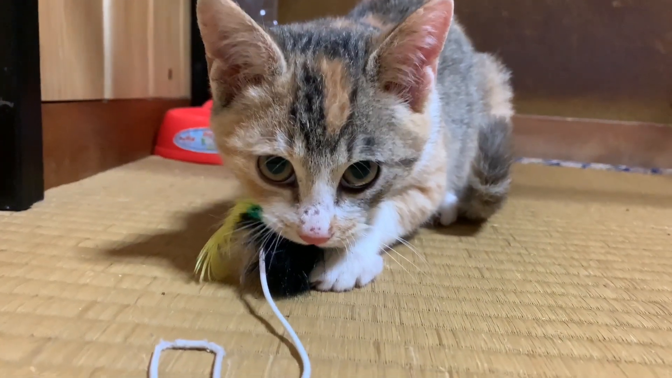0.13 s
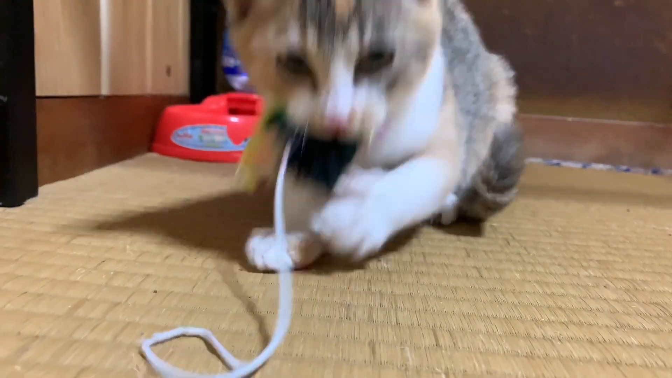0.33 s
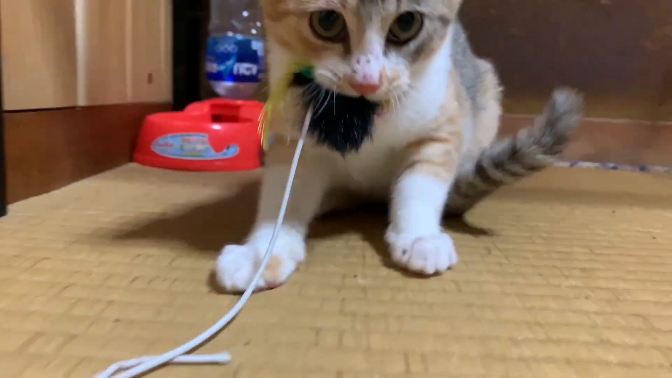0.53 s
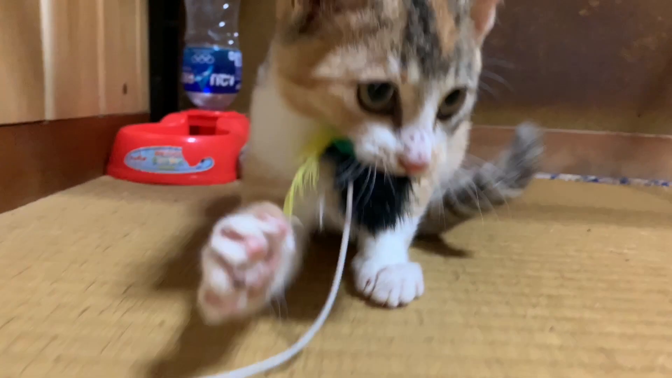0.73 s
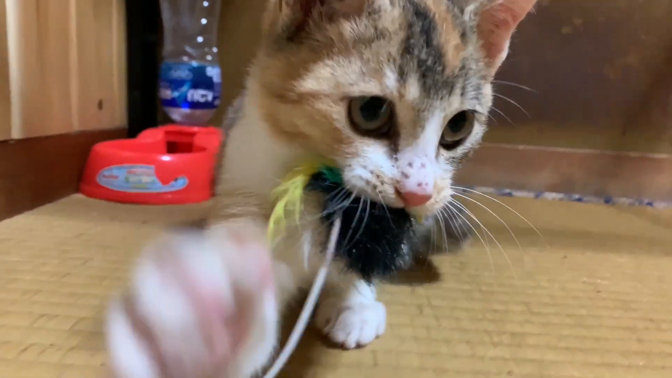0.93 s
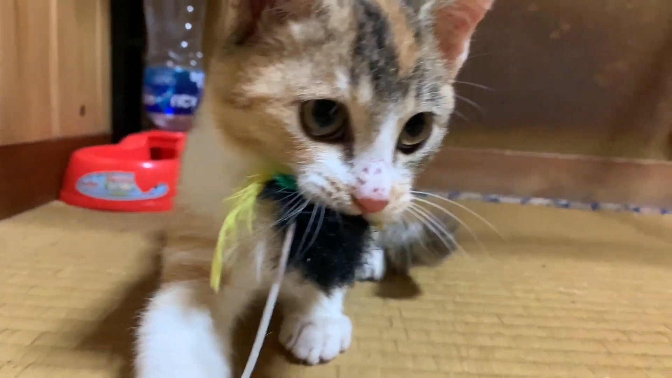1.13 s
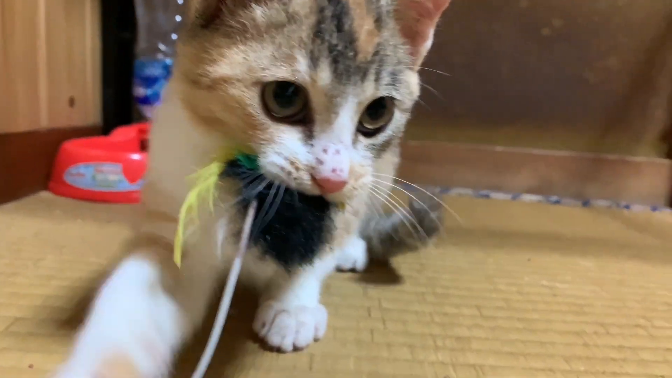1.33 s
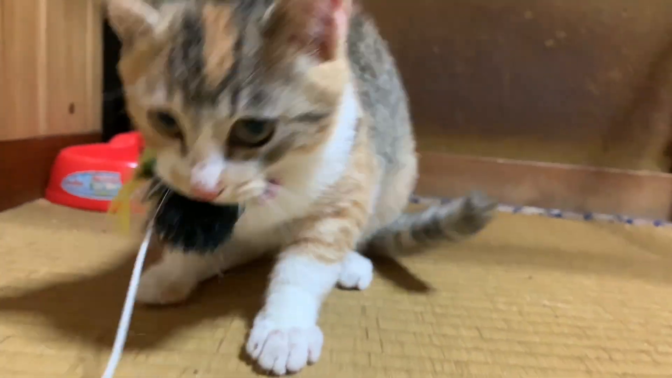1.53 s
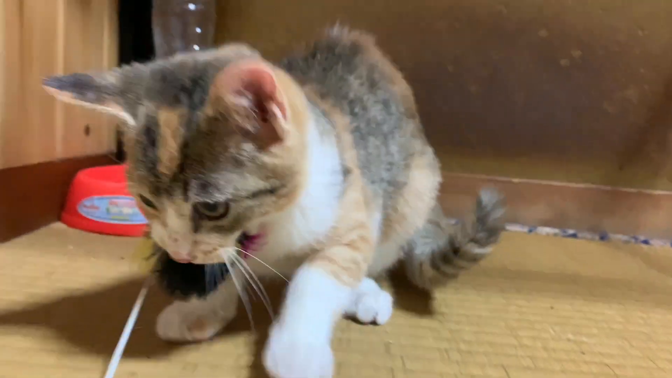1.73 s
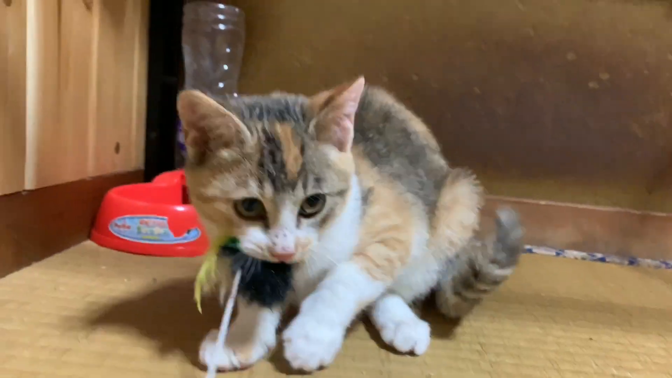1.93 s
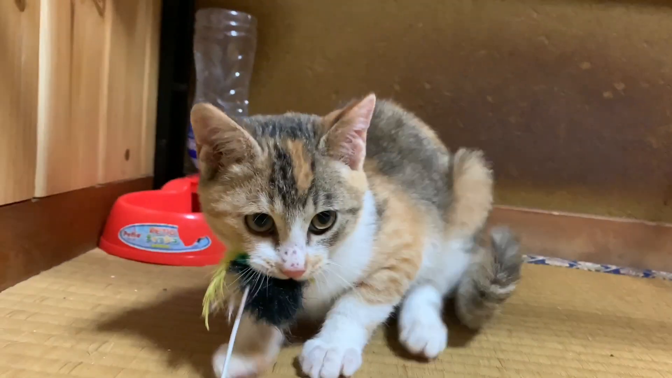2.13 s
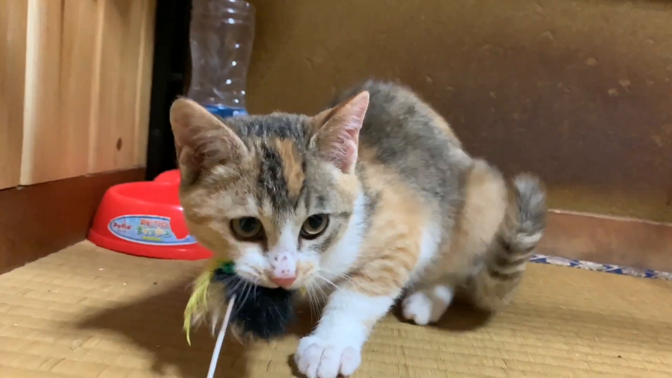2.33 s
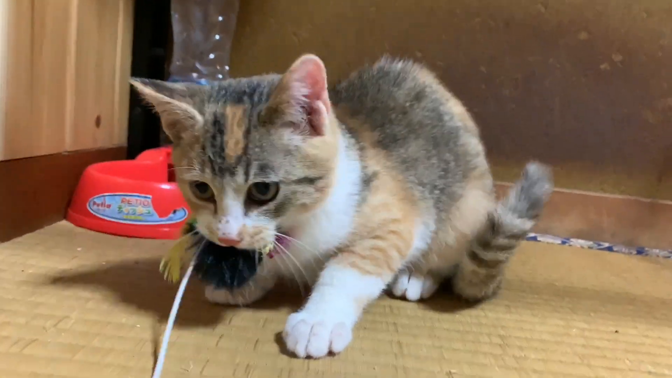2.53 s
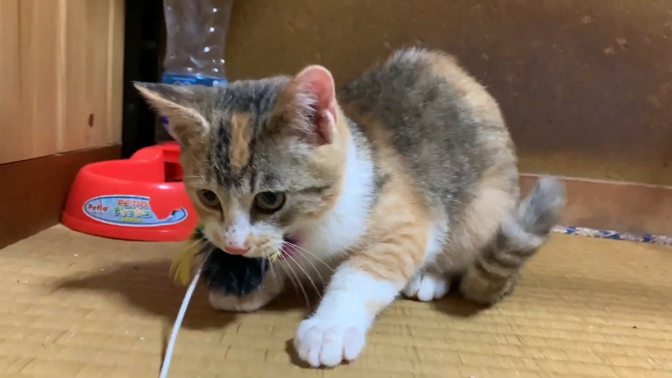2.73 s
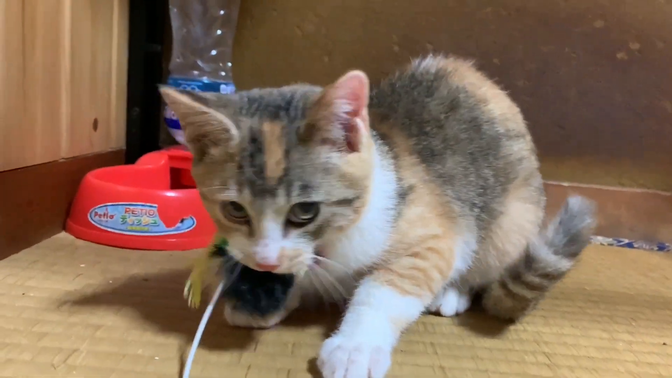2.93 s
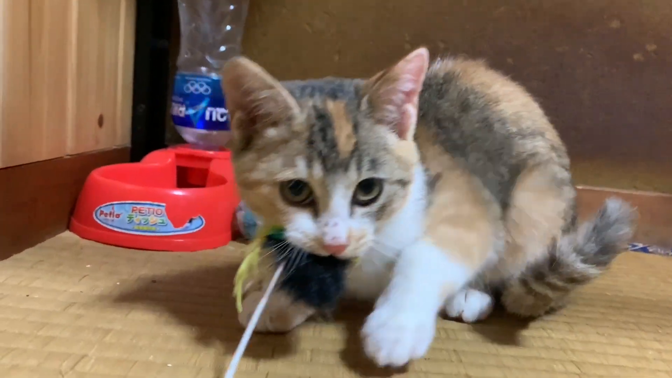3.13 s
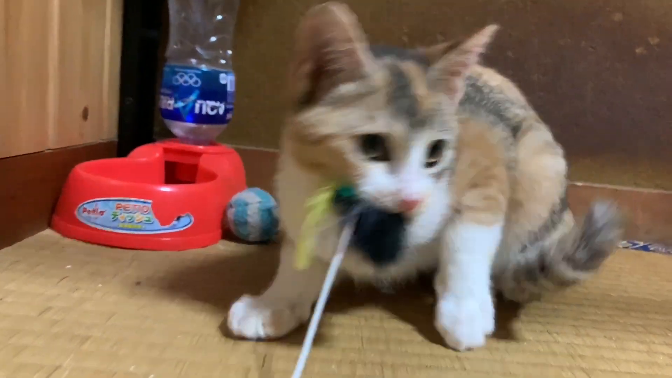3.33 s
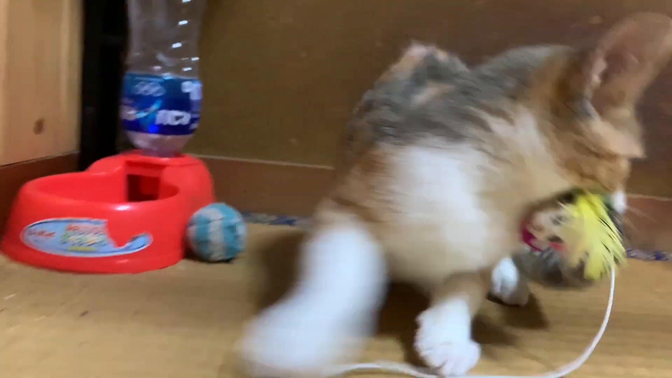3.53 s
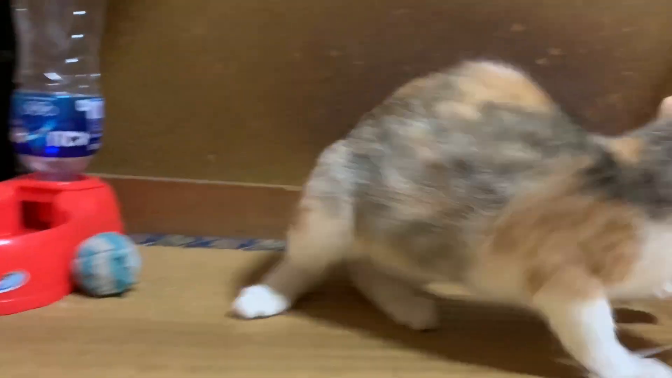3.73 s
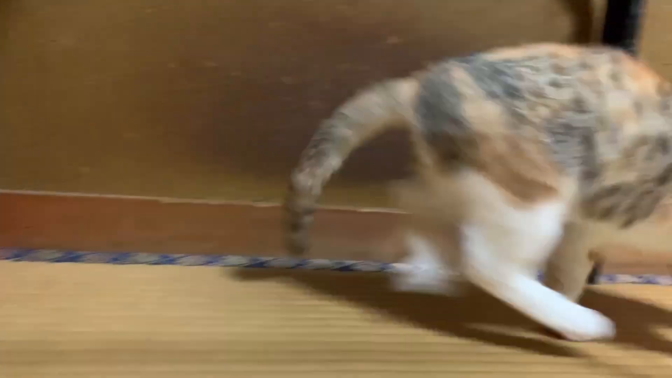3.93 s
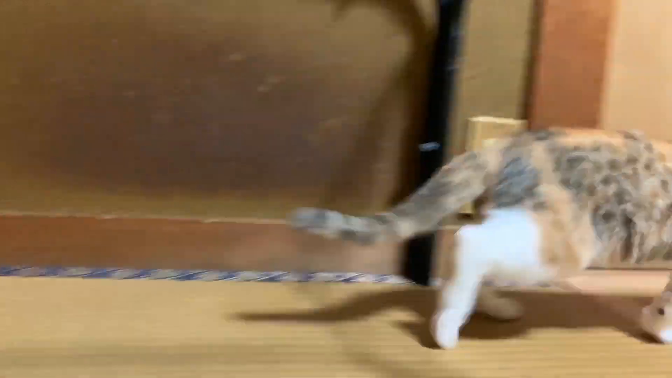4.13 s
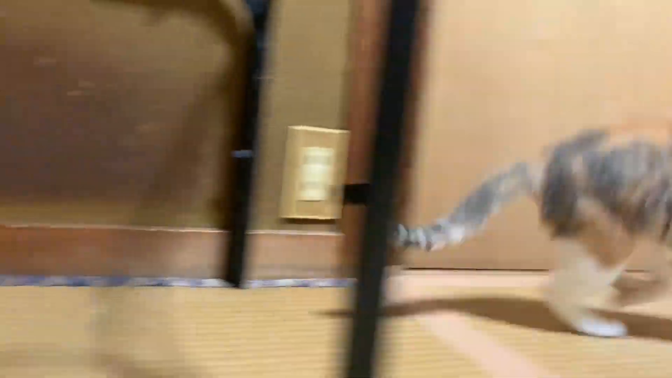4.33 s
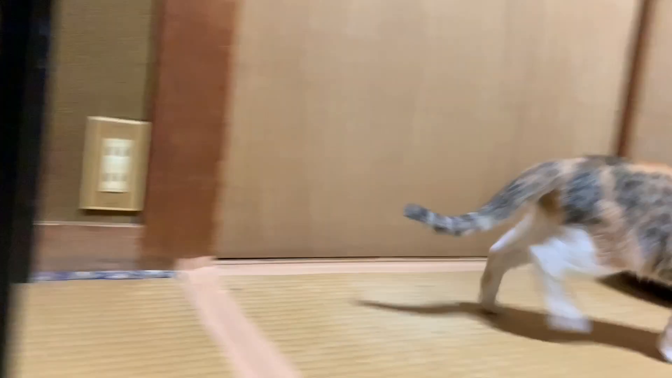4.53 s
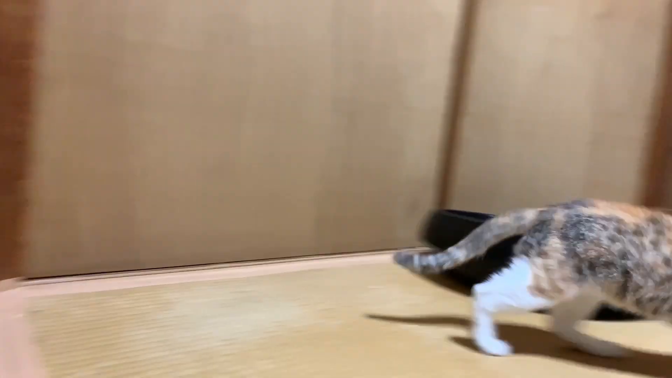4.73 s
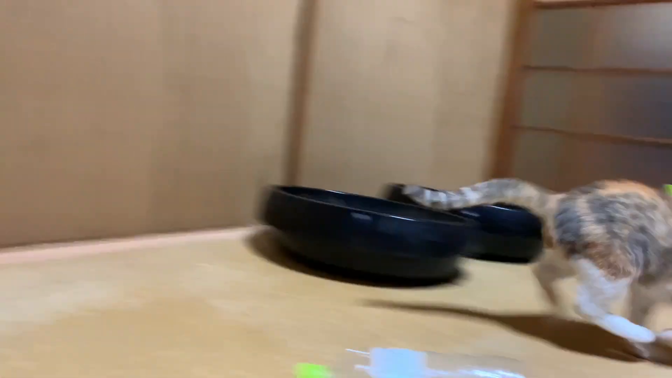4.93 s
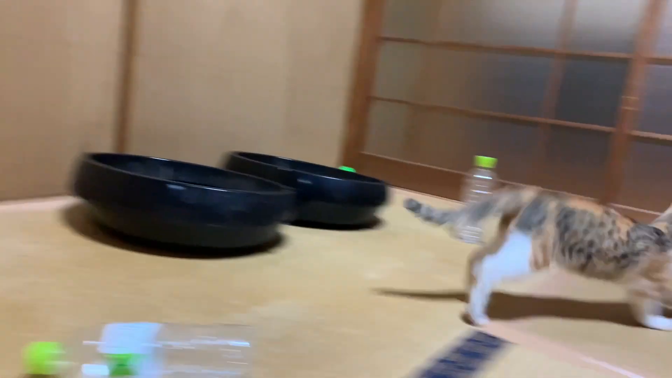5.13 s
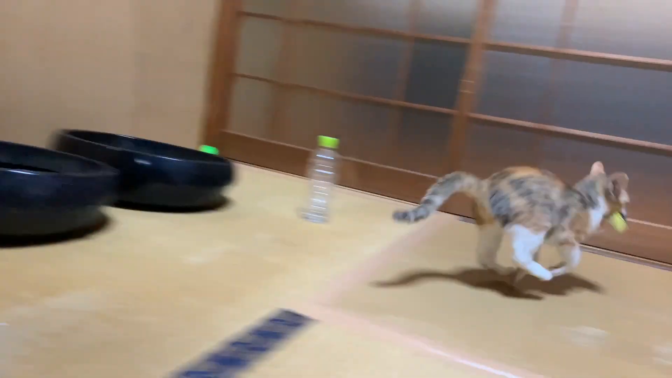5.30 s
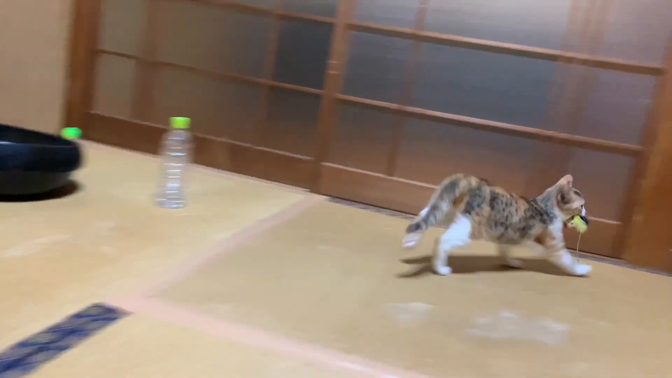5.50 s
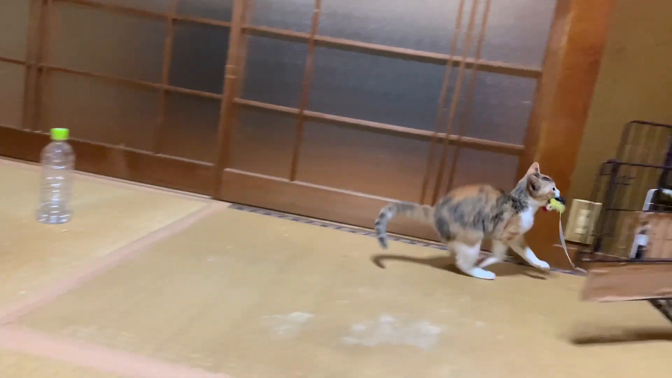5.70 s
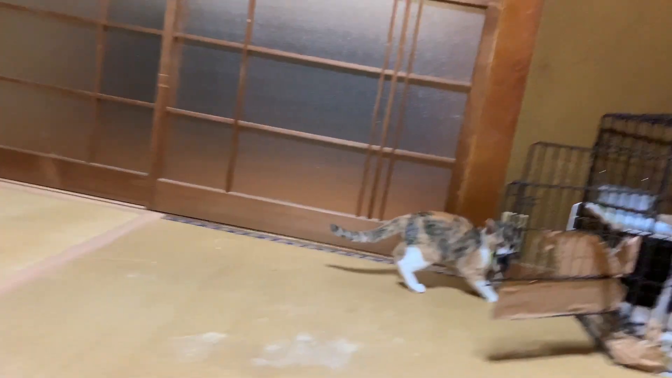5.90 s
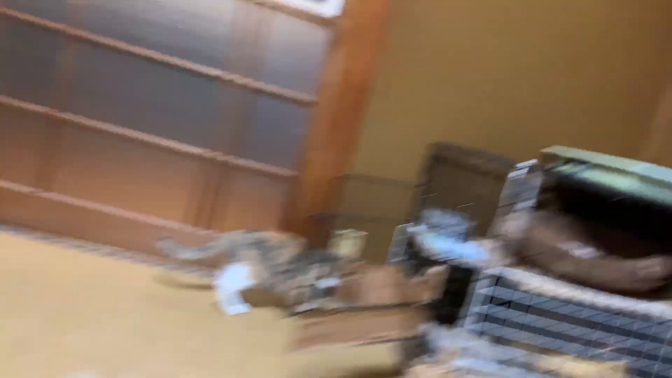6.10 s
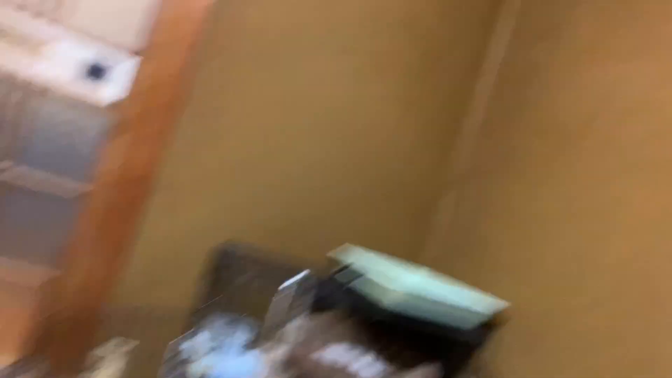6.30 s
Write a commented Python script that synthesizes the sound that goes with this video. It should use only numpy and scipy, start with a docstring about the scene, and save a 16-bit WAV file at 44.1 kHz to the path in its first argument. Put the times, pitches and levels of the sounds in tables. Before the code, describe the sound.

A kitten gives a short low rasping growl through a toy in its mouth, then bolts off, the toy's wand clattering and scraping over straw matting.

```python
"""A kitten growls over a feather toy in its mouth: pulsing folds, throat resonances and rasping air.
It shuffles on a straw mat (filtered noise), then runs off to the right with the toy. The toy's cord and
plastic wand drag and clatter behind: rubbing noise, cracks and ringing modes. Paws ring the boards,
low decaying swings thump through the floor, straw and throat tick. A small room, low rumble, faint hiss."""
import sys
import numpy as np
from scipy import signal
from scipy.fft import rfft, irfft
from scipy.io import wavfile
from scipy.ndimage import uniform_filter1d, map_coordinates

SR = 44100
rng = np.random.default_rng(int(sys.argv[2]) if len(sys.argv) > 2 else 0)


def unload_audio(sound):
    """Save the sound as a 16-bit wav file, at the path given as the first command line argument."""
    columns = np.transpose(np.atleast_2d(sound))
    # keep every value between -1 and 1, then stretch to whole-number steps
    steps = np.round(np.clip(columns, -1, 1) * 32767)
    wavfile.write(sys.argv[1], SR, steps.astype(np.int16))


N = 284797
TIME = np.arange(N) / SR

TURN_S, TURN_LENGTH_S = 0.277, 0.018  # the air turns from inward to outward
IN_HZ, OUT_HZ, SAG_HZ_PER_S = 146.6, 139.06, 17
OVERSHOOT_HZ, SETTLE_S, DROP_HZ_PER_DB = 33, 0.028, 1.4  # outward pitch starts high, drops as air is spent
TREMBLE_HZ, TREMBLE_DB = 13.3, 3.0  # inward stroke only
PUSH_S, PUSH_WIDTH_S = 0.314, 0.044
SPENT_S, RELEASE_DB_PER_S = 0.8, 135
# Growl layers. Each: inward level in dB, outward level in dB, lift in the push in dB, outward sag in dB per s.
CHEST, MOUTH, RASP = (-44.5, -37, 5, 12.5), (-57, -39.5, 4, 12), (-63, -58, -2, 7)


def effort(unsteady_db=1.2, wander=0.007):
    """Breath drive: share of air flowing out, fold pitch in Hz, and gains of chest, mouth and rasp."""
    outward = np.clip((TIME - TURN_S) / TURN_LENGTH_S + 0.5, 0, 1)
    since_s = np.maximum(TIME - TURN_S, 0)
    tremble_db = TREMBLE_DB * np.cos(2 * np.pi * TREMBLE_HZ * TIME)
    push = np.exp(-((TIME - PUSH_S) / PUSH_WIDTH_S) ** 2)
    spent_db = RELEASE_DB_PER_S * np.maximum(TIME - SPENT_S, 0)
    force_db = unsteady_db * waver(31) - spent_db
    out_hz = OUT_HZ + OVERSHOOT_HZ * np.exp(-since_s / SETTLE_S)
    out_hz = out_hz - SAG_HZ_PER_S * since_s - DROP_HZ_PER_DB * spent_db
    out_hz = np.maximum(out_hz, 0.7 * OUT_HZ)
    hz = ((1 - outward) * IN_HZ + outward * out_hz) * (1 + wander * waver(25))
    gains = []
    for in_db, out_db, push_db, sag_db in (CHEST, MOUTH, RASP):
        out_gain = amp(out_db + force_db + push_db * push - sag_db * since_s)
        gains.append((1 - outward) * amp(in_db + tremble_db) + outward * out_gain)
    return outward, hz, gains


# Growl spectra: throat, rasp on the inward and outward stroke, open jaw, air between the teeth, snarl.
# Each row: frequency in Hz, gain in dB.
THROAT = [(60, -34), (135, -28.5), (195, 16.5), (280, 6.5), (410, 3), (490, -14), (630, -4), (740, -13.5),
          (870, -2.5), (1020, -15), (1180, -44), (1600, -42.5), (3200, -80)]
RASP_IN = [(400, -1), (620, 4.5), (750, -32), (1000, 10), (1250, -7.5), (1700, 1.5), (2100, -6),
           (2450, 2.5), (3050, -3.5), (3600, -15), (4200, -9.5), (4900, -30), (5700, -16), (8000, -64)]
RASP_OUT = [(600, 11), (1000, 13.5), (1200, 1), (1480, 4), (1800, -2.5), (2200, 3.5), (2900, -27),
            (3600, -38), (4450, -6.5), (5000, -24), (5700, -7.5), (6500, -29), (7400, -38), (8500, -30)]
OPEN_JAW = [(200, -5.5), (315, 2), (440, 0.5), (700, -3), (1100, -12.5)]
TEETH = [(400, -9.5), (900, 12.5), (1600, 6), (2300, 6), (3000, 5), (3500, -14), (4250, 10), (5300, -21),
         (6300, -7.5), (8300, -16.5), (9900, 2), (12000, -19), (15500, -21)]
SNARL_TONE = [(200, -24), (450, 5), (630, 2), (800, 1.5), (1050, -5), (1300, -19), (1900, -20), (2900, -30),
              (3500, -18), (4250, -13), (5300, -44), (9000, -67)]
# Spit that opens the growl, and its voiced snarl.
# Each: full at in s, attack in s, hold in s, release in s, level in dB.
SPIT = (.29, .036, .04, .062, -48.5)
SNARL = (.281, .014, .018, .055, -45)
# Folds strain, catch and twice fall slack. Each row: time in s, strain in dB, slackness 0-1.
FOLDS = [(.275, 2, .3), (.3, 3.5, .1), (.335, -.5, .2), (.355, 0, .6), (.372, 2, .83), (.4, 0, .95),
         (.47, 4, .55), (.57, 1, .4), (.61, 3, .98), (.8, 2, 1), (.88, 5, .86)]
ROUGH_IN, ROUGH_OUT = 0.65, 0.31  # share of noise in the folds, 0-1
PAIR_WEAKER, PAIR_SKEW_CYCLES = 0.36, 0.035  # every second pulse of slack folds: weaker, out of step
POP_DB, POP_SCATTER_DB = -1, 2.5  # throat pop at each fold closing, against the rasping air


def growl(shimmer=0.12, purr_depth=0.58, wet_db=-15):
    """Slack folds beat in strong-weak pairs into a nearly shut mouth; air rasps through on every beat."""
    outward, hz, (chest_gain, mouth_gain, rasp_gain) = effort()
    spit_gain = envelope(*SPIT)
    gape = (spit_gain / spit_gain.max()) ** 0.25
    rough = ROUGH_IN + (ROUGH_OUT - ROUGH_IN) * outward
    when_s, strain_db, slackness = np.transpose(FOLDS)
    strain = amp(np.interp(TIME, when_s, strain_db))
    slack = np.interp(TIME, when_s, slackness)

    jitter = 0.075 * rough * (1 - gape / 2) * waver(110)
    turns = np.cumsum(hz * (1 + jitter)) / SR
    paired = turns + PAIR_SKEW_CYCLES * slack * np.cos(np.pi * turns)
    beat = np.diff(np.floor(paired), prepend=0)
    strength = 1 - PAIR_WEAKER * slack * (np.floor(paired) % 2)
    strength = strength * (1 + shimmer * waver(110))
    clicks = beat * strength
    puff = unit(strength * (0.4 * rough + np.exp(-5 * (paired % 1))))

    pulses = unit(colour(clicks - uniform_filter1d(clicks, size=640), THROAT))
    breathy = unit(colour(puff * rng.standard_normal(N), THROAT))
    throat = ((1 - rough) * pulses + rough * breathy) / np.hypot(1 - rough, rough)
    # the jaw drops for the spit and recolours the throat
    throat = (1 - gape) * throat + gape * unit(colour(throat, OPEN_JAW))
    throat = throat * amp([[0.7], [-0.7]])  # slightly louder on the left
    snarl = envelope(*SNARL) * placed(unit(colour(clicks, SNARL_TONE))[0], TURN_S)

    # inward, the folds flutter unevenly and little but the fundamental sounds
    flutter = 1 + purr_depth * (1 - outward) * waver(88)
    chest = np.sqrt(2) * np.cos(2 * np.pi * turns) * flutter

    scatter_db = POP_SCATTER_DB * np.clip(rng.standard_normal(N), -2, 2)
    pops = unit(clicks * amp(scatter_db))
    breath = puff * noise(N) + amp(POP_DB) * placed(pops, TURN_S)
    rasp = (1 - outward) * unit(colour(breath, RASP_IN)) + outward * unit(colour(breath, RASP_OUT))
    rasp = unit(patchy(rasp, depth_db=3.2, width_hz=550, length_s=0.03))
    spit = spit_gain * unit(colour(breath, TEETH))
    mouth = strain * (mouth_gain * throat + rasp_gain * rasp) + snarl + spit
    return chest_gain * chest + mouth + amp(wet_db) * room(mouth)


# Wand modes. Each row: frequency in Hz, level in dB, t60 in s.
WAND_MODES = [(911, 13.5, 0.0097), (992, 6.5, 0.033), (1265, 4, 0.032), (1728, -2.5, 0.055),
              (2360, -3.5, 0.059), (3080, -15.5, 0.04), (3660, 0, 0.015)]


def wand_ring(spot_db):
    """The wand's modes, weighted anew by the spot that lands and by the way it points."""
    t = TIME[:8192]
    hz, db, t60_s = np.transpose(WAND_MODES)[:, :, None]
    spot, detune, turn = rng.standard_normal((3, len(hz), 1))
    phase = 2 * np.pi * hz * (1 + 0.035 * detune) * t
    fade = amp(db + spot_db * spot - 60 * t / t60_s)
    return np.array([(fade * np.sin(phase + side * turn * hz / 1400)).sum(0) for side in (1, -1)])


# Wand blows, before the direct and room gains. Each row: start in s, peak in dB, clack near 2 kHz in dB,
# bite near 4 kHz in dB, snap at 7 kHz in dB, t60 in s, following skid against the knock in dB.
KNOCKS = [(1.032, -58.5, 3, 0, 1, .035, -25), (1.732, -57, 10, -6, -6, .03, -9),
          (2.974, -63.5, -2, 0, -1, .12, -9), (3.542, -40, 13, 21, 6, .012, -20),
          (3.553, -34.5, 9.5, 11, 4.5, .026, -13), (3.688, -45, 10.5, 1, 8.5, 0.041, -22),
          (3.731, -37, 14.5, 9, -2, 0.024, -28), (3.777, -51, 5, 2, -1, 0.047, -6),
          (3.819, -38.5, 0, -9, 2, 0.056, -29), (3.909, -54, 15, 13, 21, 0.043, -35),
          (4.028, -47.5, 3, -1, 4.5, 0.052, -18), (4.179, -58, 3, -1, 8, .12, -20),
          (4.334, -48.5, 9, 6, -8, 0.042, -16.5), (4.432, -50.5, -20, -8, 4, 0.02, -20.5),
          (4.556, -50, 23, 14, 7, 0.013, -7), (4.68, -53, 20, 13, 8, 0.056, -25),
          (4.753, -42, 2, 1, -29, .035, -9.5), (4.759, -33.5, 7, 10.5, -9, .012, -45),
          (4.885, -44.5, 4, 9.5, 12.5, 0.048, -21.5), (5.09, -39, -3, 1, -2, .023, -18),
          (5.104, -32, -5, -2, 4, .006, -23), (5.128, -46, 11.5, -1, -2, .04, -11),
          (5.366, -37.5, -10, -10, -30, .005, -34), (5.463, -42, 11.5, 7, 9.5, 0.009, -10.5),
          (5.58, -53, -21, -1, 2, 0.025, -17), (5.674, -54, -21, -14, -15, .025, -5.5),
          (5.831, -47.5, 1, -13, 12, 0.033, -8.5), (6.251, -61.5, 3, 12, 7, 0.27, -10)]
# Wand body spectrum. Each row: frequency in Hz, gain in dB.
WAND = [(150, -19.5), (300, -12.5), (480, -4.5), (700, -1.5), (1000, 5.5), (1400, -1.5), (2500, -8),
        (3600, -18.5), (4500, -15), (6000, -21), (8500, -21), (15000, -33)]
# Room send, rising as the kitten gets away. Each row: time in s, gain in dB.
DISTANCE = [(3.8, -22.5), (4.7, -6.5)]
CLEAN_S = 0.035  # blows shorter than this are mostly one crack, longer ones mostly rattle


def knocks(ring_db=2.5, spot_db=3, direct_db=-2, rise_share=0.038):
    """Each blow is a crack or short rattle plus wand ring, coloured by its hardness; the room answers."""
    out = np.zeros((2, N))
    crack = colour(signal.unit_impulse(8192), WAND)[0]
    for s, db, clack_db, bite_db, snap_db, t60_s, _ in KNOCKS:
        clean = np.exp(-(t60_s / CLEAN_S) ** 2)
        rattle = peaked(colour(scratch(t60_s, rise_s=rise_share * t60_s, grain_db=4.0), WAND))
        blow = np.sqrt(clean) * peaked(placed(crack, s)) + np.sqrt(1 - clean) * rattle
        ring = amp(ring_db) * (1 - 0.7 * clean) * peaked(wand_ring(spot_db))
        hardness = [(1200, 0), (2100, clack_db), (3900, bite_db), (7000, snap_db)]
        add(out, s, amp(db) * peaked(colour(blow + ring, hardness)))
    send = amp(np.interp(TIME, *np.transpose(DISTANCE)))
    return amp(direct_db) * out + room(out * send)


# Scrape and hiss spectra. Each row: frequency in Hz, gain in dB.
SCRAPE = [(110, -28), (190, 4.5), (330, -8), (450, -3.5), (700, -3.5), (1000, -5), (1500, -6.5), (2300, -9),
          (3000, -16.5), (5000, -15.5), (7000, -64.5)]
HISS = [(2500, -9.5), (4400, -8.5), (5500, -8), (7000, -8.5), (10000, -19.5), (15500, -35)]
# Slide of the wand (before the speed factor) and its late swish.
# Each: full at in s, attack in s, hold in s, release in s, level in dB.
SLIDE = (4, 0.5, 0.6, 2.6, -58.5)
SWISH = (5.78, .75, .1, .55, -63.8)
BOLT_S, SPEED_UP_S = 3.37, 3.96  # the kitten takes off; time to full speed
SKID_T60_S, HISS_DB = 0.48, -13.5  # hiss against scrape


def drag(bounce_db=1.5, bounce_hz=22):
    """The wand slides behind the kitten, pressing unevenly as it bounces and skidding after each knock."""
    skid_power = 0
    for s, db, *_, skid_db in KNOCKS:
        skid = amp(db + skid_db - 60 * abs(TIME - s) / SKID_T60_S)
        skid_power = skid_power + (TIME > s) * skid ** 2
    speed = np.clip((TIME - BOLT_S) / SPEED_UP_S, 0, 1)
    rub = np.sqrt(speed * (skid_power + envelope(*SLIDE) ** 2))
    press_db = bounce_db * waver(bounce_hz)
    scrape = rub * amp(press_db) * friction(SCRAPE, grain_db=3.2)
    hiss_gain = np.hypot(amp(HISS_DB) * rub, envelope(*SWISH))
    hiss = hiss_gain * amp(press_db / 2) * friction(HISS, grain_db=0.5)
    return scrape + hiss


# Scuff spectrum. Each row: frequency in Hz, gain in dB.
SCUFF = [(400, -6), (1000, 0), (2200, -5), (4000, -8), (7000, -20.5), (15000, -25)]


def scuffs(lead_db, trail_db, lead_t60_s=0.084, trail_t60_s=0.31):
    """The toy catches in the straw just before each knock and scratches on after it."""
    gain = 0
    for s, db, *_, skid_db in KNOCKS:
        away_s = abs(TIME - s)
        lead = amp(lead_db - 60 * away_s / lead_t60_s)
        trail = amp(trail_db - 60 * away_s / trail_t60_s)
        gain = gain + amp(db + skid_db / 2) * np.where(TIME < s, lead, trail)
    return gain * friction(SCUFF, grain_db=3.8)


# Short ticks: claws and cord in the straw, a sputter of the growl at 0.37 s and its last throat pulse
# at 0.931 s. Each row: start in s, peak in dB, pitch in Hz.
TICKS = [(0.278, -49, 3970), (0.37, -56, 7800), (0.59, -54.5, 9600), (0.703, -64.5, 7500),
         (0.434, -66, 5700), (.931, -71, 1240), (1.729, -57.5, 14700), (2.53, -54, 14400),
         (3.213, -58, 5300), (3.369, -59.5, 16100), (3.49, -58, 4770), (3.728, -49.5, 12500),
         (3.817, -42.5, 16100), (3.906, -60, 8300), (4.232, -61.5, 8700)]
# faint ones come by chance while the claws dig in for the run
SCRABBLE_FROM_S, SCRABBLE_TO_S, SCRABBLE_MIN_DB, SCRABBLE_HZ = 3.38, 3.45, -65, 14000


def ticks(count=4, spread_db=3):
    """Tiny dry ticks of straw and throat: short noise clusters peaking at one pitch."""
    out = np.zeros((2, N))
    faint = []
    for when, force in rng.random((count, 2)):
        s = SCRABBLE_FROM_S + when * (SCRABBLE_TO_S - SCRABBLE_FROM_S)
        faint.append((s, SCRABBLE_MIN_DB + spread_db * force, SCRABBLE_HZ))
    for s, db, hz in TICKS + faint:
        tick = scratch(t60_s=0.025, rise_s=0.00021, grain_db=3.5)
        tone = [(hz / 8, -8), (hz * 0.77, -12), (hz, 0), (hz * 2, -15)]
        add(out, s, amp(db) * peaked(colour(tick, tone)))
    return out + amp(-12) * room(out)


# Paws landing on the boards under the mat. Each row: start in s, peak in dB.
FOOTFALLS = [(1.032, -60.5), (3.556, -57), (3.825, -52), (4.181, -58.5), (4.432, -49.5), (4.555, -50.5),
             (4.759, -72), (5.11, -53), (5.191, -48), (5.366, -53.5), (5.464, -45.5), (5.575, -53.5),
             (6.26, -59.5)]
# Woody ring of the boards. Each row: frequency in Hz, level in dB, t60 in s.
BOARD_MODES = [(191, -2, 0.17), (263.5, -1, 0.12), (364, -0.5, 0.13), (444, -3.5, 0.086), (528, 0, 0.082),
               (669, -11.5, 0.11), (907, -11, 0.049)]


def footfalls(pad_t60_s=0.0099, spot_db=3, detune=0.072, wet_db=-9):
    """A padded paw knocks the boards under the mat; each spot rings a little differently."""
    out, t = np.zeros((2, N)), TIME[:16384]
    hz, mode_db, t60_s = np.transpose(BOARD_MODES)[:, :, None]
    for s, db in FOOTFALLS:
        spot, shift = rng.standard_normal((2, len(hz), 1))
        fade = amp(mode_db + spot_db * spot - 60 * t / t60_s)
        ring = (fade * np.sin(2 * np.pi * hz * (1 + detune * shift) * t)).sum(0)
        pad = scratch(pad_t60_s, rise_s=0.0032, grain_db=2.5)
        add(out, s, amp(db) * peaked(signal.fftconvolve(pad, ring[None], axes=1), size=350))
    return out + amp(wet_db) * room(out)


# Floor thumps, before the overall gain. Each row: start in s, peak in dB, pitch in Hz, t60 in s.
THUMPS = [(3.594, -40, 59.6, 0.22), (3.649, -41.5, 66.7, 0.39), (3.825, -27, 84, 0.07),
          (3.876, -36, 75.6, 0.071), (4.003, -37.5, 78.3, 0.19), (4.172, -46, 71.5, 0.35),
          (4.439, -37.5, 61, 0.22), (4.761, -36, 63.4, 0.11), (4.809, -41.5, 75.6, 0.25),
          (5.035, -46, 104.2, 0.28), (5.105, -46.5, 155, 0.13), (5.359, -42, 101, 0.12),
          (5.397, -45, 76.1, 0.93), (5.468, -39.5, 77, 0.32), (5.728, -42, 94.5, 0.23),
          (5.797, -47.5, 89.8, 0.24), (6.106, -50.5, 111, 0.16), (6.366, -46, 76.6, 0.067)]
# Thud spectrum. Each row: frequency in Hz, gain in dB.
THUD = [(30, -34), (60, -1), (120, 6.5), (180, -14), (280, -20), (450, -28), (900, -56)]


def thumps(rise_s=0.0055, thud_db=-9, gain_db=1.5):
    """A soft push sets the floor swinging in a decaying sine, with a dull noise thud on top."""
    out, t = np.zeros((2, N)), TIME[:22050]
    for s, db, hz, t60_s in THUMPS:
        push = (1 - np.exp(-(t / rise_s) ** 2)) * amp(-60 * t / t60_s)
        swing = np.sin(2 * np.pi * hz * t) * push
        thud = colour(noise(len(t)) * push, THUD)
        thump = peaked(swing[None], size=512) + amp(thud_db) * peaked(thud, size=512)
        add(out, s, amp(db) * thump)
    return amp(gain_db) * out


# Fur, feathers and paws brushing the mat, before the overall gain.
# Each row: full at in s, attack in s, hold in s, release in s, level in dB.
BRUSHES = [(0.481, 0.028, 0.017, 0.039, -63.5), (1.435, 0.11, 0.085, 0.12, -67),
           (2.402, 0.079, 0.15, 0.12, -67.5)]
# Brush spectrum. Each row: frequency in Hz, gain in dB.
BRUSH = [(250, -30), (500, -3), (900, 8), (1350, -1), (2000, 0), (3700, -1), (5200, 0), (7300, -3),
         (10000, -5), (16000, -18)]


def brushes(gain_db=4):
    """Soft strokes of friction noise over the mat as the kitten shifts its stance."""
    return amp(gain_db) * sum(envelope(*row) for row in BRUSHES) * friction(BRUSH, grain_db=1.5)


# Two swells of the rumble. Each row: full at in s, attack in s, hold in s, release in s, level in dB.
SWELLS = [(0.49, 1, 0.29, 0.33, -56.5), (3.648, 0.82, 2.09, 0.5, -53.5)]
# Rumble spectrum. Each row: frequency in Hz, gain in dB.
RUMBLE = [(18, -48), (40, -5.5), (60, 4), (85, -11), (120, -11.5), (200, -23.5), (330, -27.5), (500, -50.5),
          (1000, -52.5)]
STILL_DB = -60.5  # rumble between the swells


def rumble():
    """Steady low-frequency noise that swells twice: around half a second, and again from about 3.6 s to 5.7 s."""
    level = np.hypot(amp(STILL_DB), sum(envelope(*row) for row in SWELLS))
    return level * unit(colour(noise(N), RUMBLE, size=16384))


# Room hiss spectrum. Each row: frequency in Hz, gain in dB.
AIR = [(100, 14), (300, 11.5), (600, 5.5), (1000, 0.5), (2000, -2), (4000, -6), (7000, -14), (9500, -1.5),
       (12000, -26.5), (14000, -11), (16000, -24)]


def air(level_db=-74, drift_db=2.0):
    """The faint hiss of the room, its level fluctuating."""
    return amp(level_db + drift_db * waver(28.0)) * unit(colour(noise(N), AIR))


# Room decay. Each row: frequency in Hz, t60 in s.
ROOM = [(100, 0.64), (500, 0.27), (2000, 0.34), (6000, 0.25), (14000, 0.015)]


def room(x, build_s=0.0055):
    """A diffuse tail, each band dying at its own speed."""
    hz, t, z = signal.stft(noise(size=32768), SR, nperseg=256)
    z = z * amp(-60 * t / read(ROOM, hz)[:, None]) * (1 - np.exp(-t / build_s))
    tail = signal.istft(z, SR)[1]
    return signal.fftconvolve(x, tail / np.linalg.norm(tail[0]), axes=1)[:, :N]


# Path of the kitten to the right. Each row: time in s, bearing from -1 left to 1 right.
BEARING = [(.5, -0.5), (3.5, -0.2), (4.4, 0.8)]
SIDE_DELAY_S = 0.00029  # lag at the farther microphone for a sound fully to one side


def placed(x, s):
    """A sound from the kitten's bearing at time s: it reaches the farther microphone later."""
    bearing = np.interp(s, *np.transpose(BEARING))
    lags = [int(max(-near, 0) * SIDE_DELAY_S * SR) for near in (-bearing, bearing)]
    return np.array([np.pad(x, (lag, 0))[:len(x)] for lag in lags])


def friction(spectrum, grain_db):
    """Many tiny slips over the straw, bunched into grains, their colour shifting from spot to spot."""
    slips = colour(noise(N) * amp(grain_db * waver(137)), spectrum)
    return unit(patchy(slips, depth_db=4, width_hz=272, length_s=0.04))


def scratch(t60_s, rise_s, grain_db):
    """A quick cluster of noise grains that swells and dies away."""
    t = TIME[:8192]
    grains = amp(grain_db * unit(uniform_filter1d(rng.standard_normal(len(t)), size=40)))
    return noise(len(t)) * grains * (1 - np.exp(-t / rise_s)) * amp(-60 * t / max(t60_s, 0.004))


def patchy(x, depth_db, width_hz, length_s):
    """Lets each band of x swell and fade on its own."""
    hz, t, z = signal.stft(x, SR, nperseg=512)
    place = np.meshgrid(hz / width_hz, t / length_s, indexing="ij")
    field = map_coordinates(rng.standard_normal(size=(160, 400)), place, order=1, mode="wrap")
    return signal.istft(z * amp(depth_db * field), SR)[1][:, :N]


def envelope(full_s, attack_s, hold_s, release_s, db):
    """Gain that swells, holds and fades; attack and release are the times for a tenfold change."""
    early_s = np.maximum(full_s - TIME, 0)
    late_s = np.maximum(TIME - full_s - hold_s, 0)
    return amp(db) * 10 ** -(early_s / attack_s + late_s / release_s)


# Likeness of the two microphones. Each row: frequency in Hz, left-right correlation.
LIKENESS = [(100, 0.91), (300, 0.72), (700, 0.19), (1500, -0.0058), (4500, -0.019), (9000, -0.056)]


def noise(size):
    """White noise at two microphones, alike in the bass."""
    a, b = rfft(rng.standard_normal((2, size)))
    same = np.clip(read(LIKENESS, np.fft.rfftfreq(size, 1 / SR)), -1, 1)
    mid, side = a * np.sqrt((1 + same) / 2), b * np.sqrt((1 - same) / 2)
    return irfft(np.array([mid + side, mid - side]), size)


def waver(rate_hz):
    """Slow random variation with an rms of one."""
    lowpass = np.exp(-(np.fft.rfftfreq(N, 1 / SR) / rate_hz) ** 2)
    return unit(irfft(rfft(rng.standard_normal(N)) * lowpass, N))


def colour(x, spectrum, size=4096):
    """Passes x through a causal minimum-phase filter with the given spectrum."""
    log_gain = np.log(amp(read(spectrum, abs(np.fft.fftfreq(size, 1 / SR)))))
    ring = np.fft.ifft(np.exp(np.conj(signal.hilbert(log_gain)))).real[:size // 2]
    return signal.oaconvolve(np.atleast_2d(x), ring[None], axes=1)[:, :x.shape[-1]]


def amp(db):
    """Decibels to gain."""
    return 10 ** (np.asarray(db) / 20)


def unit(x):
    """Scales to an rms of one."""
    return x / np.sqrt(np.mean(x ** 2) + 1e-20)


def peaked(x, size=128):
    """Scales the loudest stretch of size samples to an rms of one."""
    return x / np.sqrt(uniform_filter1d((x ** 2).mean(0), size).max() + 1e-20)


def read(points, hz):
    """Reads a table on a log-frequency axis."""
    f, value = np.transpose(points)
    return np.interp(np.log(hz + 1), np.log(f + 1), value)


def add(mix, s, sound):
    """Mixes a stereo sound in at time s."""
    part = mix[:, max(round(s * SR), 0):][:, :sound.shape[1]]
    part += sound[:, :part.shape[1]]


def scene():
    """The kitten, its toy and the room."""
    kitten = growl() + footfalls() + brushes()
    toy = knocks() + drag() + scuffs(lead_db=-10, trail_db=-14.5)
    return kitten + toy + ticks() + thumps() + rumble() + air()


def record(dry):
    """The microphone's bass cut at 30 Hz and the band limit at 15.9 kHz."""
    bass_cut = signal.butter(2, 30, "highpass", fs=SR, output="sos")
    band_limit = signal.firwin(511, 15900, window=("kaiser", 9), fs=SR)
    return signal.oaconvolve(signal.sosfilt(bass_cut, dry), band_limit[None], "same", axes=1)


dry = scene()
out = record(dry)
unload_audio(out)
```